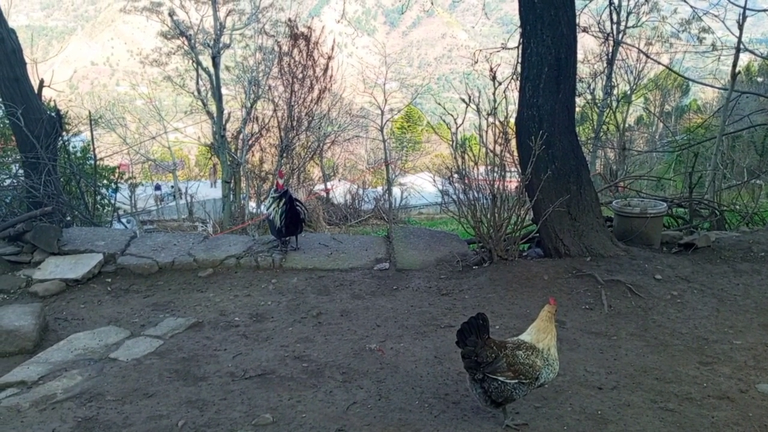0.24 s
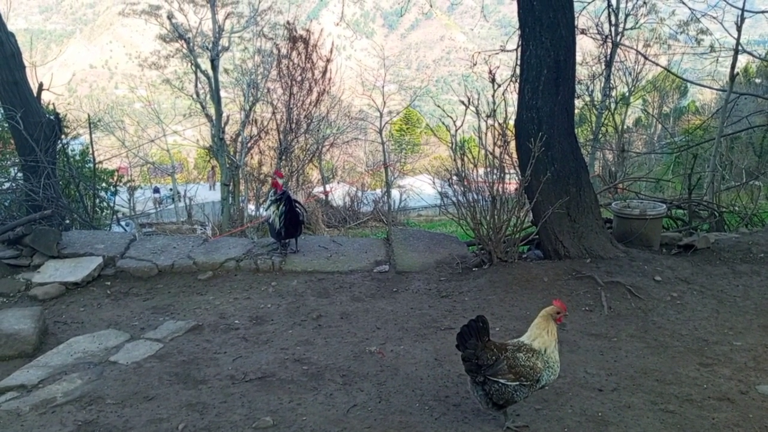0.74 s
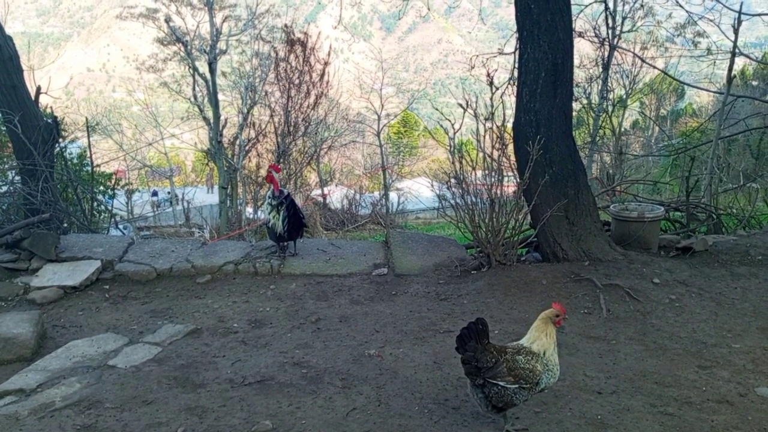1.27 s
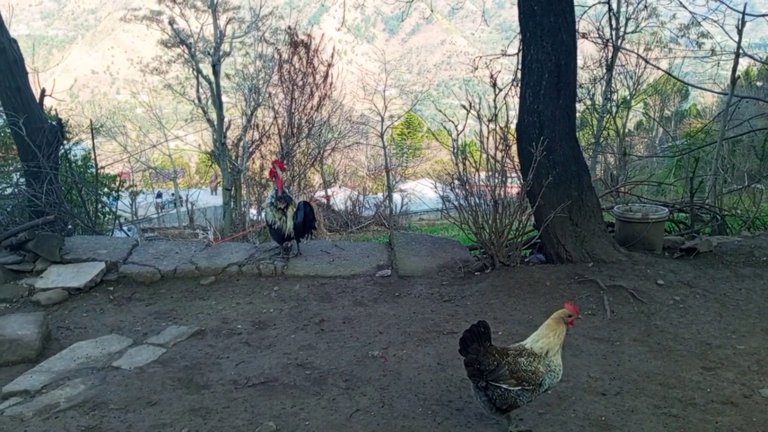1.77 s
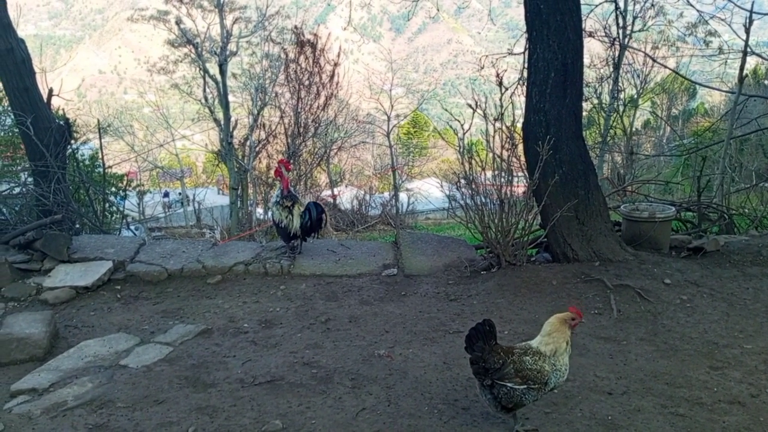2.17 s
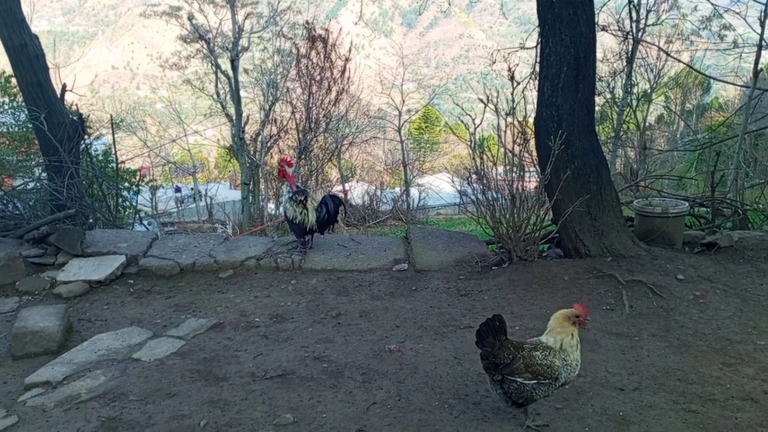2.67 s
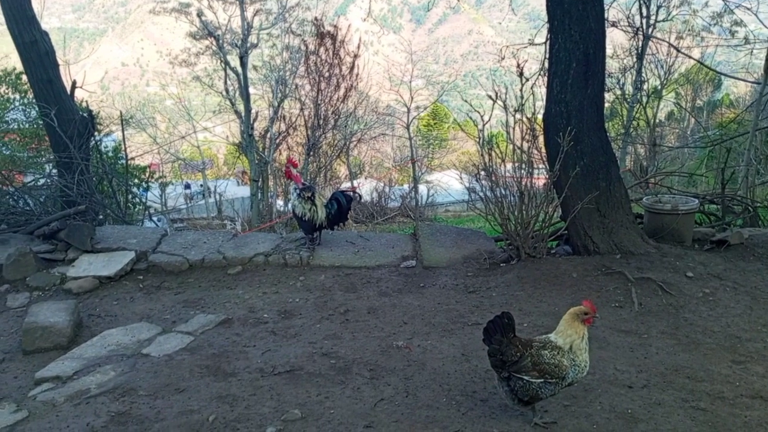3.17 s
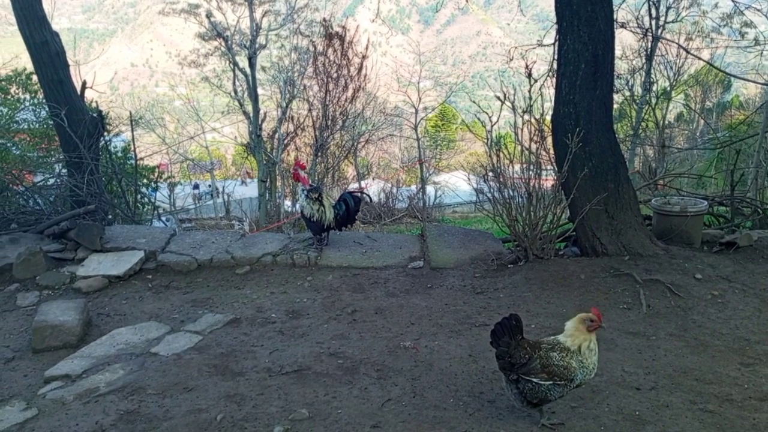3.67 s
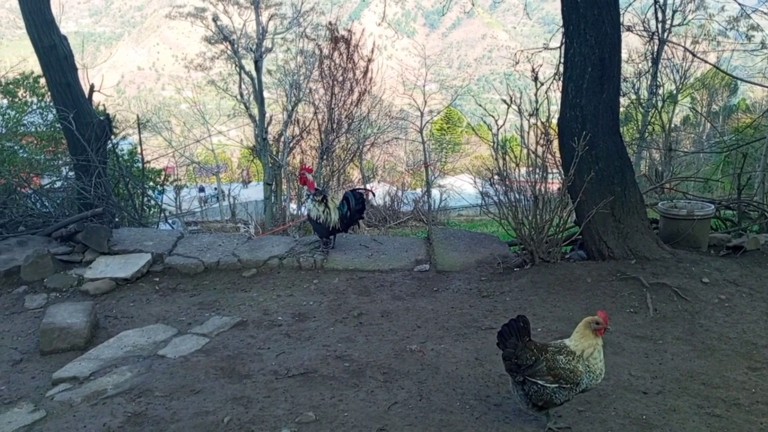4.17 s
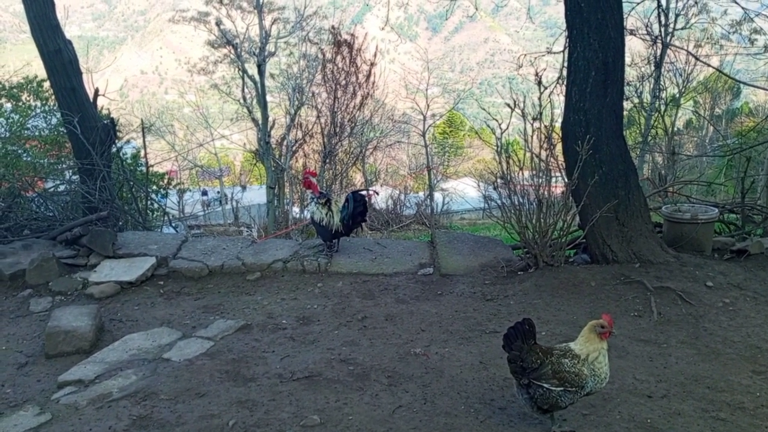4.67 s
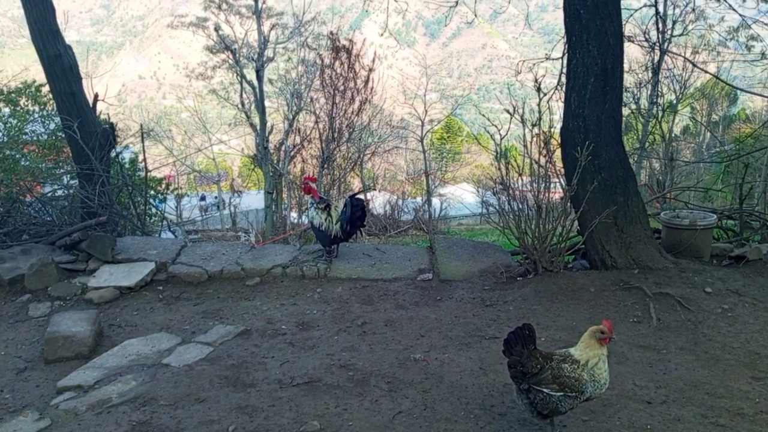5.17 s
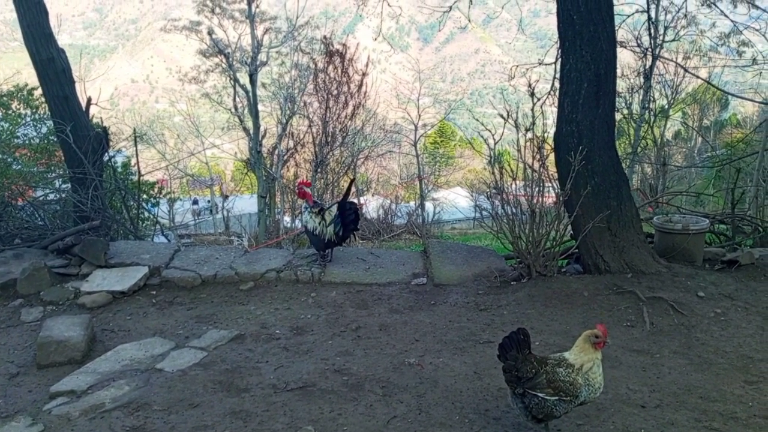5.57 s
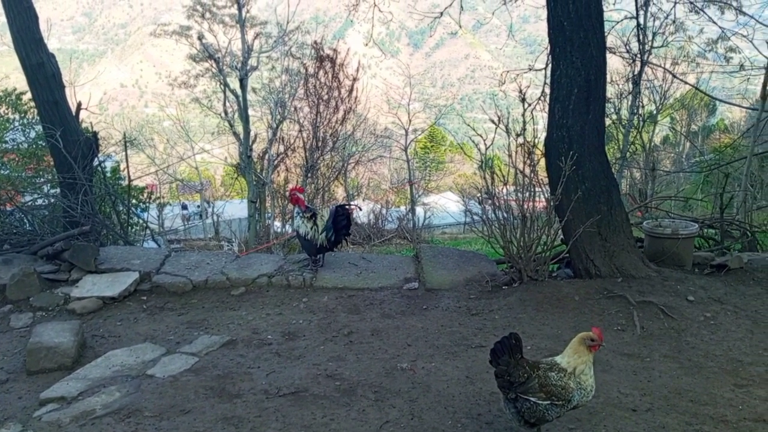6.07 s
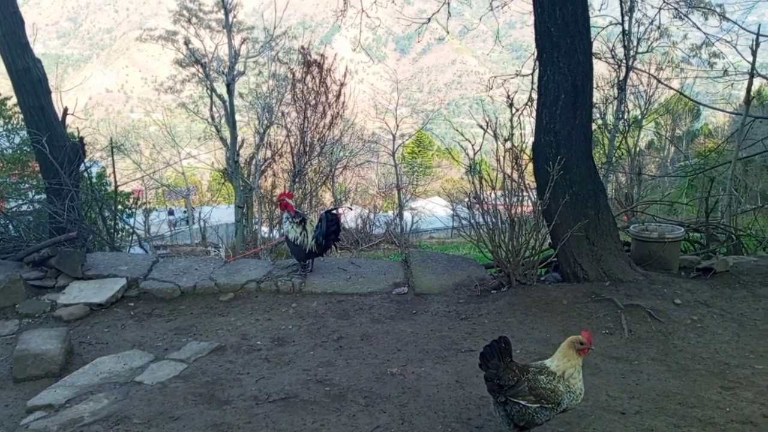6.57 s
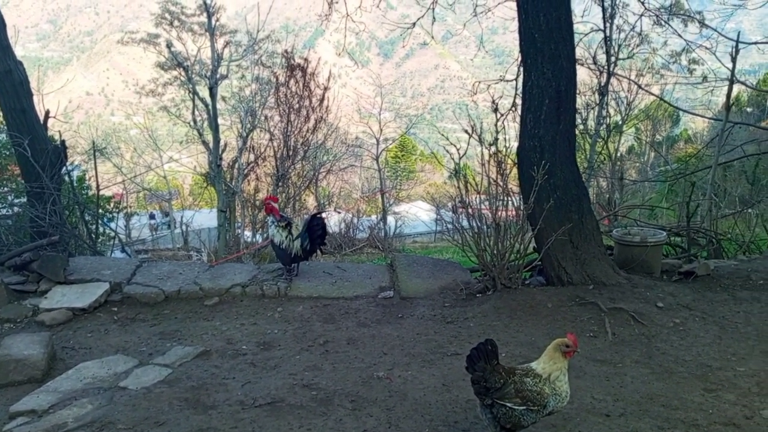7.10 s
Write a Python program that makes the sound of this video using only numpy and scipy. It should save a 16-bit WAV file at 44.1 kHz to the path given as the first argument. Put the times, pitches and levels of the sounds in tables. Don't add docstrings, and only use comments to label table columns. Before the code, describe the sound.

Outdoors in a quiet village yard, sparrows chirp over faint low rumble, then a short wing flutter and distant hen cackles. A rooster a few metres away crows very loudly: raspy first syllable, cracking rise, long clear note, sagging end. Two quick whistled warbles follow, then soft hiss, sparse chirps and tiny rustles. Simple microphone with audible noise suppression.

```python
import sys
import numpy as np
from scipy import signal
from scipy.fft import rfft, irfft
from scipy.io import wavfile
from scipy.ndimage import uniform_filter1d, minimum_filter1d

SR = 44100
rng = np.random.default_rng(int(sys.argv[2]) if len(sys.argv) > 2 else 0)


def elevation(decibels):
    levels = np.asarray(decibels, float)
    return 10 ** (levels / 20)


def to_wav(s):
    ch = np.atleast_2d(s).T
    pcm = np.round(np.clip(ch, -1, 1) * 32767)
    wavfile.write(sys.argv[1], SR, pcm.astype(np.int16))


N = 323694
TIME = np.arange(N) / SR


def rms_one(x):
    return x / np.sqrt(np.mean(x ** 2) + 1e-20)


def in_time(rows, time=TIME):
    s, *columns = np.transpose(rows)
    return [np.interp(time, s, c) for c in columns]


def drift(hz, size=N):
    r = np.exp(-2 * np.pi * hz / SR)
    noise = rng.standard_normal(size + 9000)
    return rms_one(signal.lfilter([1], [1, -2 * r, r * r], noise)[9000:])


def cycles(pitch):
    return 2 * np.pi * np.cumsum(pitch) / SR


def coloured(spectrum, size=N):
    hz = np.arange(size // 2 + 1) * SR / size + 1
    points = np.array(spectrum)
    gain = elevation(np.interp(np.log(hz), np.log(points[:, 0]), points[:, 1], left=-90, right=-90))
    return rms_one(irfft(rfft(rng.standard_normal(size)) * gain, size))


def echoes(x, wet_db, t60, gap_s):
    t = np.arange(SR // 2) / SR
    cloud = rng.standard_normal(len(t)) * elevation(-60 * t / t60) * (t > gap_s)
    cloud = cloud / np.sqrt(np.sum(cloud ** 2))
    return x + elevation(wet_db) * signal.fftconvolve(x, cloud)[:len(x)]


def faded(rows, t):
    return uniform_filter1d(sum(db * 1. * ((t > a) & (t < b)) for a, b, db in rows), size=1100)


def suppressor_steps():
    # start in seconds, background in dB, partial 1 in dB, partial 2 in dB.
    switches = [(0, 1, 3.5, 5.5), (3.06, -18.5, 0.5, 5.5), (3.11, -7.5, 5, 5.5), (3.14, -2.5, 1.5, 5),
                (3.163, -1, 5.5, 5.5), (3.192, -19, 1.5, 5.5), (3.248, 2.5, 6.5, 5.5),
                (3.305, -12.5, 0.5, 2.5), (3.401, 6.5, 6.5, 0.5), (3.42, -7.5, 3, -24.5),
                (3.462, 8.5, 6.5, 4), (3.487, -3, -13, 6), (3.54, 9.5, 1, 10), (3.619, -15, 3.5, 5.5),
                (3.683, -5, 7, 7), (3.718, -1.5, 3.5, -6.5)]
    rows = np.array(switches)
    held = rows[np.searchsorted(rows[:, 0], TIME, "right") - 1, 1:]
    ramp = 1804.5 * TIME[:, None]
    return uniform_filter1d(np.maximum.accumulate(held + ramp, axis=0) - ramp, size=120, axis=0).T


def background(step_db):
    # frequency in Hz, density in dB per Hz.
    yard = [(24, -53.5), (40, -14.5), (156, -7.5), (422, -11), (853, -11.5), (955, -14.5), (1280, -15.5),
            (1540, -18), (2260, -24), (4070, -20.5), (6410, -26), (9000, -45.5), (11700, -86),
            (19800, -120)]
    # frequency in Hz, density in dB per Hz.
    microphone_air = [(5470, -34.5), (9300, -4.5), (9690, -12.5), (12500, -13), (14900, -6.5),
                      (15600, -5.5)]
    # time in seconds, gain in dB.
    grip = [
        (1.41, -3),
        (1.64, -6.5),
        (2.5, -5),
        (2.92, 8.5),
        (3.21, 8),
        (3.58, -0.95),
    ]
    grip_db, = in_time(grip)
    rumble_db = -57 + grip_db
    hiss_db = -82.5 + TIME / TIME[-1] + 0.5 * grip_db
    noise = coloured(yard)
    low = signal.sosfiltfilt(signal.butter(2, 600, fs=SR, output="sos"), noise)
    hum = elevation(-59.0 + 0.19 * drift(8.6)) * rms_one(noise - low)
    rumble = elevation(rumble_db + 6.0 + 1.4 * drift(28)) * rms_one(low)
    hiss = elevation(hiss_db + 5.0 + 1.3 * drift(7)) * coloured(microphone_air)
    return elevation(step_db) * (rumble + hum) + hiss


def rustles():
    # start in seconds, length in seconds, low edge in Hz, high edge in Hz, level in dB.
    flaps = [(0.148, 0.15, 3520, 5000, -47.5), (0.91, 0.086, 1190, 3000, -33.5),
             (0.92, 0.12, 950, 4800, -38.5), (0.92, 0.2, 5860, 6900, -52.5), (0.941, 0.081, 320, 920, -41),
             (6.02, 0.1, 3000, 4900, -51), (6.39, 0.03, 8500, 13500, -54), (6.364, 0.21, 8500, 9800, -65),
             (6.474, .016, 8000, 15700, -52), (6.485, .035, 8500, 13930, -46),
             (6.525, .035, 9000, 13000, -60), (6.4855, 0.046, 14670, 15540, -48),
             (6.478, 0.068, 3800, 7000, -52), (6.52, .14, 5000, 6700, -60), (6.98, .2, 4700, 6900, -61),
             (6.959, 0.046, 87, 370, -51.5)]
    # start in seconds, low edge in Hz, level in dB.
    ticks = [(1.211, 3450, -56), (4.109, 2630, -46), (5.481, 7040, -60), (5.538, 4920, -55),
             (5.808, 4350, -50), (6.63, 6030, -69), (6.833, 2300, -49), (6.95, 4500, -53),
             (7.047, 7480, -52.5), (7.212, 6050, -65)]
    bursts = flaps + [(s, 0.0045, hz, 2.1 * hz, db) for s, hz, db in ticks]
    out = np.zeros(N)
    grains = rng.standard_normal(N) * elevation(2.8 * drift(400))
    for start, length, low_hz, high_hz, db in bursts:
        i = round(start * SR) + np.arange(round(length * SR))
        band = signal.butter(4, [low_hz, high_hz], "band", fs=SR, output="sos")
        burst = rms_one(signal.sosfilt(band, grains[i]))
        out[i] += elevation(db) * burst * signal.windows.tukey(len(i), .3) * elevation(np.linspace(4, -9, len(i)))
    return out


def chirps(rows, wet_db):
    out, buzz, flutter = np.zeros(N), drift(240), drift(38)
    for start, length, from_hz, to_hz, db in rows:
        buzz_pc = 1.25 + 16 * abs(np.log(to_hz / from_hz))
        first = round(start * SR)
        i = first + np.arange(min(round(length * SR), N - first))
        pitch = np.linspace(from_hz, to_hz, len(i)) * (1 + buzz_pc / 100 * buzz[i])
        level = elevation(db - 2.0 + 2.5 * flutter[i]) * signal.windows.tukey(len(i), .5)
        out[i] += level * np.sin(cycles(pitch))
    return echoes(out, wet_db=wet_db, t60=0.27, gap_s=0.0084)


def wild_birds():
    # start in seconds, length in seconds, start pitch in Hz, end pitch in Hz, level in dB.
    sparrows = [(0.18, 0.061, 3890, 3850, -41), (0.228, 0.052, 3350, 3340, -46),
                (0.743, 0.061, 4530, 4460, -38.5), (0.792, 0.043, 4090, 3950, -47),
                (0.835, 0.024, 4300, 4240, -37.5), (0.853, 0.026, 3860, 3840, -38),
                (.9, 0.098, 4460, 4460, -41.5), (0.981, 0.046, 4130, 4090, -36),
                (1.028, 0.07, 4090, 4540, -41), (4.977, 0.058, 4600, 4500, -51),
                (5.032, 0.039, 4150, 4310, -41), (5.149, 0.0184, 4850, 3970, -36.5),
                (6.003, 0.021, 4200, 5500, -48), (6.027, .035, 4560, 4410, -47),
                (6.045, 0.0349, 4850, 4800, -55), (6.039, 0.055, 3910, 3790, -40.5),
                (6.465, 0.034, 4710, 4490, -47), (6.762, 0.048, 4510, 4380, -51),
                (6.83, 0.048, 4390, 4450, -55.5), (6.775, .035, 5060, 5010, -55),
                (6.79, .02, 4190, 3500, -53), (6.845, 0.041, 3350, 3450, -53.5)]
    # start in seconds, length in seconds, start pitch in Hz, end pitch in Hz, level in dB.
    finches = [(0.544, 0.04, 5570, 3350, -60), (4.373, .018, 3700, 5700, -54),
               (4.384, .05, 5700, 6520, -52), (4.426, .02, 4200, 5330, -57), (6.51, 0.12, 6650, 6580, -54),
               (6.528, 0.076, 5200, 6180, -54.5), (6.614, 0.046, 5380, 5390, -51.5),
               (6.953, 0.031, 4800, 5310, -50), (6.983, .06, 6730, 6680, -47),
               (6.989, 0.045, 6200, 6210, -41.5), (7.041, .11, 6200, 6140, -53),
               (7.072, .02, 4200, 5500, -55), (7.16, 0.049, 5500, 5290, -56),
               (7.277, 0.068, 5240, 5140, -48.5)]
    return chirps(sparrows + finches, wet_db=-4.5)


def hens():
    # start in seconds, length in seconds, start pitch in Hz, end pitch in Hz, level in dB.
    cackles = [(0.899, 0.043, 2260, 2280, -33), (0.929, 0.125, 2173, 1980, -32.5),
               (0.976, 0.062, 240, 245, -42), (1.007, 0.1096, 1992, 2152, -26.5),
               (1.107, 0.084, 2210, 2077, -33), (1.335, 0.12, 2310, 2224, -56),
               (6.325, .035, 2450, 2340, -56), (6.355, .045, 2130, 2040, -54.5),
               (6.467, 0.065, 630, 635, -40)]
    return chirps(cackles, wet_db=-4.5)


def stray_whistles():
    # start in seconds, length in seconds, start pitch in Hz, end pitch in Hz, level in dB.
    strays = [(1.532, 0.035, 762.3, 685, -8), (1.628, 0.025, 732, 820, -12.5),
              (1.549, 0.019, 2385, 2390, -14.5), (1.575, 0.069, 3600, 3240, -28),
              (1.64, 0.049, 1651, 1520, -14.5), (3.622, 0.028, 3700, 4343, -16),
              (3.694, .016, 2109, 2034, -11), (3.71, 0.025, 2300, 1982, -22.5),
              (3.79, .03, 2050, 2150, -23.5), (3.824, 0.018, 1550, 1200, -21),
              (3.82, 0.0344, 570, 480, -32.5), (3.85, 0.048, 470, 410, -39.5), (3.74, .03, 5300, 5250, -30),
              (3.7, .025, 760, 720, -18.5), (3.7, .02, 1520, 1500, -26), (1.555, .05, 2150, 1950, -19.5),
              (1.62, .05, 3250, 3400, -26), (1.7, .09, 1550, 1500, -36), (1.565, .07, 1290, 1260, -16),
              (1.59, 0.055, 6450, 5900, -27.5), (1.715, .06, 4800, 3800, -40.5)]
    return chirps(strays, wet_db=-13.5)


def partial_levels(t, level_db, beak, hoarse, sunk, crack, pitch, step, first, second):
    # beak shut in dB, beak open in dB.
    beak_db = [(-1.33, -8), (-16, 2.5), (-1, -26.5), (-23.5, -12)]
    # multiple of the pitch, level in dB.
    narrow_beak = [(1, 0), (2, -5), (3, -15), (4, -5), (5, -33.5), (6, -23.5), (7, -24.5), (8, -28.5),
                   (9, -36.5), (10, -35.5), (11, -42), (12, -38.5), (13, -61.5), (14, -69), (15, -67),
                   (16, -70), (17, -61), (18, -44.5), (19, -55)]
    # multiple of the pitch, level in dB.
    wide_beak = [(1, -3), (2, 0), (3, -22), (4, -21), (5, -30.5), (6, -52.5), (7, -45.5), (8, -24),
                 (9, -14), (10, -13.5), (11, -63.5), (12, -66), (13, -38), (14, -73), (15, -58),
                 (16, -62.5), (17, -59.5), (18, -62), (19, -62)]
    # start in seconds, end in seconds, change in dB.
    head_turns = [
        [(3.19, 3.25, -8.5), (3.31, 3.385, -11.5), (3.5, 3.6, 4.5), (3.725, 3.79, -10.5)],
        [(2.9, 2.93, -18), (3.14, 3.165, -20.5), (3.2, 3.25, -8), (3.29, 3.345, -11), (3.4, 3.49, 6.5),
         (3.5, 3.69, -4), (3.7, 3.9, -22)],
        [(2.65, 2.9, -15), (3.3, 3.69, 8), (3.38, 3.4, -15.5), (3.7, 3.9, -20.5)],
        [(2.66, 2.78, -9.5), (2.94, 3.405, -21), (3.64, 3.69, -9)],
        [(2.53, 2.63, 5), (2.8, 3.04, -8), (3.29, 3.38, -13), (3.56, 3.69, -20.5), (3.7, 3.9, -18)],
        [(2.35, 2.45, -10), (2.57, 2.62, -17.5), (2.77, 2.8, -8.5), (3.2, 3.3, -14.5), (3.38, 3.4, -20.5),
         (3.5, 3.61, -13.5), (3.7, 3.9, -19)],
        [(2.47, 2.56, -8.5), (2.66, 2.715, -16.5), (2.72, 2.88, -5.5), (3.04, 3.165, -7), (3.29, 3.345, -18),
         (3.47, 3.525, -20), (3.56, 3.585, -15), (3.73, 3.9, -16)],
        [(2.72, 2.74, -12.5), (3.19, 3.345, -11.5), (3.41, 3.435, -20.5), (3.47, 3.525, -8.5),
         (3.59, 3.69, -20.5)],
        [(2.62, 3.3, -15), (3.735, 3.775, 7.5)],
        [(2.64, 3.1, -21), (3.36, 3.78, -14)],
        [(2.38, 2.78, -13.5), (3.2, 3.69, -13.5), (3.7, 3.76, 16)],
        [(2.35, 3.068, -12)],
        [(2.45, 2.85, -12)],
        [(2.5, 3.15, -12), (3.5, 3.7, -13.5)],
        [(2.7, 3.15, -12.5)],
        [(1.8, 2.44, -14), (2.6, 3.3, -6.5), (3.5, 3.7, -16)],
        [(1.5, 3.31, -30), (3.65, 4.1, -24)],
    ]
    one, two, throat, upper = (level_db + shut + beak * (wide - shut) for shut, wide in beak_db)
    one, two, upper = one - 74 * sunk, two + 29.5 * sunk, upper - 55 * sunk
    broken = np.minimum(crack, 0)
    one, two = one + 60 * broken, two + 16 * np.abs(crack)
    throat = throat + 0.43 * step - 16 * hoarse
    low = np.minimum(pitch / 760, 1)
    narrow, wide = np.transpose(narrow_beak[4:]), np.transpose(wide_beak[4:])
    shapes = []
    for k in range(5, 20):
        shut_db, open_db = np.interp(k * low, *narrow), np.interp(k * low, *wide)
        shapes.append((1 - beak ** 2) * shut_db + beak ** 2 * open_db)
    total = 10 * np.log10(sum(elevation(db) ** 2 for db in shapes[1:]))
    high = []
    for k, db in enumerate(shapes, start=5):
        unrest = (1.5 + 6 * hoarse + 4 * (k > 13)) * drift(12, size=len(t))
        high.append(db - total + upper + 45 * broken - 2 * k * hoarse + unrest)
    near = [throat - (np.abs(k * pitch - 3481) / 146) ** 2 for k in (4, 5, 6)]
    third = .5 * (two + throat) + 0.16 * step - 10.0
    levels = [third, near[0], np.maximum(near[1], high[0]), np.maximum(near[2], high[1])] + high[2:]
    return [one + first, two + second] + [db + faded(rows, t) for db, rows in zip(levels, head_turns)]


def half_pitch(t, phase, level_db, hoarse, step):
    # multiple of the pitch, level in dB.
    halves = [(1.5, -6), (2.5, -4), (6.5, -32), (8.5, -4)]
    # start in seconds, end in seconds, change in dB.
    half_turns = [
        (2.3, 2.69, -38),
        (2.76, 2.92, 8),
        (3.2, 3.7, -15),
    ]
    half_db = level_db - 23 - 46.5 * hoarse + 0.82 * step
    out = np.zeros(len(t))
    for k, db in halves:
        turned = (k > 8) * faded(half_turns, t)
        out += elevation(half_db + db + turned + 1.5 * drift(30, size=len(t))) * np.sin(k * phase)
    return out


def throat_air(t, phase, level_db, hoarse, crack, step):
    # frequency in Hz, density in dB per Hz.
    rasp_colour = [(240, -93), (400, -81.5), (647, -15), (759, -17), (841, -32.5), (1050, -43),
                   (1320, -5.5), (1850, 3), (2330, 1.5), (2740, -42), (3260, -8), (4690, -33),
                   (5350, -12.5), (6560, -4), (13000, -62.5)]
    # frequency in Hz, density in dB per Hz.
    echo_colour = [(290, -61), (500, -31), (627, -19.5), (1450, -3.5), (2280, -11), (2680, -28),
                   (3760, -15), (6700, -17.5), (10000, -55.5), (13000, -84), (22000, -120)]
    # frequency in Hz, density in dB per Hz.
    sizzle_colour = [(3900, -50), (4700, -14), (5400, 0), (6400, -10), (7200, -6), (8600, -15),
                     (10000, -17), (11000, -23), (12200, -22), (13500, -29), (15000, -23), (15500, -32)]
    size = len(t)
    breath = np.interp(t, [1.526, 1.545, 3.86, 3.89], [0, 1, 1, 0])
    flutter = elevation(1.5 * drift(60, size=size))
    dying = np.interp(t, [1.68, 1.72, 1.83, 1.835], [0, 1, 1, 0])
    air = (1 - dying) * coloured(rasp_colour, size=size) + dying * coloured(echo_colour, size=size)
    clear_db, hoarse_db = -37.5, 7
    rasp_db = level_db + clear_db + hoarse ** 2.5 * (hoarse_db - clear_db)
    rasp_db = rasp_db + 22 * np.abs(crack) * (t > 1.836) + 0.8 * step
    rasp = breath * elevation(rasp_db) * flutter * air * (1 + 0.49 * np.sin(phase))
    sizzle_db = level_db - 35 - 20 * (1 - np.minimum(hoarse / 0.3, 1))
    sizzle = elevation(sizzle_db) * (1 - dying) * breath * flutter * coloured(sizzle_colour, size=size)
    return rasp, sizzle * (1 + np.sin(phase))


def ground_echo(x):
    # centre in Hz, width in Hz.
    notches = [(2830, 180)]
    # time in seconds, centre in Hz.
    dip = [
        (1.56, 5150),
        (1.62, 4490),
        (1.7, 4700),
    ]
    for hz, width_hz in 2 * notches:
        x = signal.lfilter(*signal.iirnotch(hz, hz / width_hz, fs=SR), x)
    hz, s, frames = signal.stft(x, SR, nperseg=512)
    centre, = in_time(dip, s)
    away = ((hz[:, None] - centre) / 400) ** 2
    return signal.istft(frames * away / (1 + away), SR, nperseg=512)[1][:len(x)]


def crow(step_db, first_db, second_db):
    # time in seconds, pitch in Hz, level in dB, beak opening 0-1, hoarseness 0-1.
    first_syllable = [(1.528, 679, -37, 1, 1.23), (1.55, 641, -18, 0.68, 0.98),
                      (1.58, 649.7, -14, 0.22, 0.83), (1.625, 636.5, -16.5, 0.47, 0.91),
                      (1.636, 691, -16, 0.65, 0.9), (1.67, 711, -28, 0.95, 0.99), (1.7, 728, -28, 0.8, 0.9),
                      (1.75, 697, -34.5, .1, 0.87), (1.829, 798.3, -54.5, .1, 1.01)]
    # time in seconds, pitch in Hz, level in dB, beak opening 0-1, hoarseness 0-1.
    rise = [(1.836, 811, -9, 0.098, 0.7), (1.886, 942, -2, .1, 0.52), (1.93, 832, -6.5, 0.16, 0.38),
            (1.97, 874, -6, 0.12, 0.45), (1.977, 780, -5.5, .1, 0.4), (2.009, 852, -6, 0.025, 0.42),
            (2.119, 876, -6.5, 0.2, 0.48), (2.204, 865, -7.5, 0.14, 0.5), (2.33, 866, -6, 0.2, 0.4)]
    # time in seconds, pitch in Hz, level in dB, beak opening 0-1, hoarseness 0-1.
    long_note = [(2.345, 867, -1, 0.11, .06), (2.432, 845, -3.5, 0.081, 0.018),
                 (2.688, 822.8, -6.5, 0.75, 0.026), (2.876, 827.3, -8, 0.6, 0.014),
                 (3.287, 818.5, -10.5, 0.66, 0.042), (3.329, 813.6, -13, 0.42, .02),
                 (3.404, 809.7, -9.5, 0.63, .02), (3.566, 790, -12.5, 0.73, 0.018),
                 (3.692, 765, -12, 0.64, 0.071)]
    # time in seconds, pitch in Hz, level in dB, beak opening 0-1, hoarseness 0-1.
    fall = [(3.699, 638.5, -14, 0.36, .2), (3.72, 626.5, -8.5, 0.69, .07),
            (3.784, 602.5, -3.5, 0.59, 0.096), (3.815, 560, -12.5, 0.54, 0.11),
            (3.83, 520, -32, 0.34, 0.58), (3.89, 443, -55, 0.13, 0.8)]
    # start in seconds, length in seconds, pitch ratio.
    cracks = [(1.82, .04, .79), (1.931, .041, .81), (2.118, .028, 1.13), (2.168, .014, 1.12),
              (2.2, .012, 1.12), (2.224, .008, .82), (2.281, .006, .86), (2.325, .015, .96)]
    part = slice(round(1.5 * SR), round(3.92 * SR))
    t, size = TIME[part], part.stop - part.start
    step, first, second = step_db[part], first_db[part], second_db[part]
    pitch, level_db, beak, hoarse = in_time(first_syllable + rise + long_note + fall, t)
    beak, hoarse = np.clip(beak, 0, 1), np.clip(hoarse, 0, 1)
    sunk = np.maximum(np.log(706.6 / pitch), 0)
    wobble_pc = .08 + 3.5 * hoarse
    crack = sum(np.log(ratio) * ((t > start) & (t < start + length)) for start, length, ratio in cracks)
    crack = uniform_filter1d(crack, size=70)
    pitch = uniform_filter1d(pitch, size=70) * np.exp(crack)
    jitter = drift(150, size=size)
    jitter -= uniform_filter1d(jitter, size=500)
    shaken = 1 + wobble_pc / 100 * jitter
    top_pitch = np.exp(-0.9 * np.maximum(crack, 0)) * pitch
    phase, top_phase = cycles(pitch * shaken), cycles(top_pitch * shaken)

    levels = partial_levels(t, level_db, beak, hoarse, sunk, crack, top_pitch, step, first, second)
    voice = half_pitch(t, phase, level_db, hoarse, step)
    for k, db in enumerate(levels, start=1):
        scatter = rng.uniform(0, 6) + .015 * k ** 1.35 * wobble_pc * drift(200, size=size)
        level = elevation(db + 1.7 * wobble_pc * drift(60, size=size))
        voice += level * np.sin(k * (phase if k < 4 else top_phase) + scatter)
    sounding = np.interp(t, [1.526, 1.545, 1.665, 1.7, 1.832, 1.838, 3.86, 3.9], [0, 1, 1, 0, 0, 1, 1, 0])
    rasp, sizzle = throat_air(t, phase, level_db, hoarse, crack, step)
    voice = np.sqrt(2) * sounding * voice + sizzle

    out = np.zeros(N)
    out[part] = echoes(rasp, wet_db=1.5, t60=.12, gap_s=.001) + voice * (t < 1.8)
    out = ground_echo(out)
    out[part] += voice * (t >= 1.8)
    tight, slack = (signal.sosfilt(signal.butter(8, hz, "high", fs=SR, output="sos"), out + 1e-18)
                    for hz in (670, 397))
    out = tight + uniform_filter1d(1. * (TIME > 3.8), size=400) * (slack - tight)
    return echoes(out, wet_db=-21, t60=.3, gap_s=.012)


def warbler():
    # seconds from the start of the phrase, pitch in Hz, level in dB.
    phrase = [
        [(0, 1199, -53), (.018, 2612, -20.5), (.03, 2608, -13.5), (.041, 2450, -17), (.052, 1959, -22.5),
         (.068, 2000, -21.5)],
        [(.082, 2455, -23), (.105, 2724, -17), (.125, 2862, -22.5), (.148, 2950, -13.5), (.158, 1952, -28),
         (.185, 2044, -19), (.205, 2212, -39.5)],
    ]
    # start in seconds, level in dB, overtone floor in dB.
    warbles = [
        (3.725, -1.5, -32),
        (4.125, -1.9, -36.5),
    ]
    rows = sum(phrase, [])
    out, t = np.zeros(N), np.arange(round(rows[-1][0] * SR)) / SR
    size = len(t)
    pitch, shape_db = in_time(rows, t)
    trill = np.exp(-((t - .098) / .028) ** 2)
    over_db = np.clip(-7 - 0.4 * np.abs(1994 - pitch), -60, 0)
    over_db = uniform_filter1d(over_db, size=300)
    for start, db, floor_db in warbles:
        beat = cycles(300 * (1 + 0.12 * drift(60, size=size)))
        phase = cycles(pitch * (1 + .03 * trill * np.sin(beat) + 0.014 * drift(130, size=size)))
        overtones = np.sin(2 * phase) + elevation(-14.5) * np.sin(3 * phase)
        tone = np.sin(phase) + elevation(np.maximum(over_db, floor_db + 8 * trill)) * overtones
        other_side = phase + cycles(773 * np.sqrt(trill)) + drift(120, size=size)
        tone += elevation(4.5) * trill * np.sin(other_side)
        level = np.sqrt(2) * elevation(db + shape_db + 3.0 * drift(100, size=size))
        i = round(start * SR)
        out[i:i + size] += level * (1 + .35 * trill * np.cos(beat)) * tone
    return echoes(out, wet_db=-4, t60=.11, gap_s=.004)


def fill_in():
    # frequency in Hz, density in dB per Hz.
    fill_colour = [(290, -45), (500, -38), (693, -7.5), (805, 1.5), (959, -9), (1120, -21), (1580, -9),
                   (2040, -19.5), (2490, -17), (2750, -28), (3400, -12.5), (4540, -21.5), (6530, -19.5),
                   (8710, -29), (10000, -41), (13000, -46), (15300, -40), (22000, -120)]
    # start in seconds, end in seconds, level at start in dB, level at end in dB.
    spans = [
        (4.504, 5.554, -47, -51),
        (5.671, 6.411, -52, -55.5),
        (6.67, 7.335, -56, -61),
    ]
    # start in seconds, cut in seconds, level in dB, drop in dB after which it is held.
    rings = [
        (3.89, 4.127, -28.5, 24.5),
        (4.312, 4.51, -30, 18.5),
    ]
    level = sum(elevation(np.interp(TIME, [a, b], [from_db, to_db], left=-200, right=-200))
                for a, b, from_db, to_db in spans)
    r, w = np.exp(-np.pi * 170 / SR), 2 * np.pi * 2930 / SR
    ring = rng.standard_normal(N)
    for twice in range(2):
        ring = signal.lfilter([1, 0, -1], [1, -2 * r * np.cos(w), r * r], ring)
    hanging = np.zeros(N)
    for a, b, db, held_db in rings:
        swell = np.clip(1 + (TIME - a) / 0.049, 0, 1)
        sinking = np.clip(198 * (TIME - a), 0, held_db)
        hanging += elevation(db - sinking) * swell * (TIME < b)
    return uniform_filter1d(level, size=150) * coloured(fill_colour) + hanging * rms_one(ring)


def scene():
    step_db, first_db, second_db = suppressor_steps()
    mix = background(step_db) + rustles() + wild_birds() + hens()
    mix += crow(step_db, first_db, second_db) + stray_whistles()
    mix += warbler() + fill_in()
    return mix[None]


def low_pass(x):
    return signal.sosfilt(signal.butter(12, 15800, fs=SR, output="sos"), x)


def record(dry):
    x = signal.sosfilt(signal.butter(2, 65, "high", fs=SR, output="sos"), dry)
    gain = minimum_filter1d(1 / np.maximum(np.abs(x), 1.015), size=400)
    gain = uniform_filter1d(gain, size=200) * 1.015
    return low_pass(np.clip(x * gain, -1, 1))


dry = scene()
out = record(dry)
to_wav(out)
```